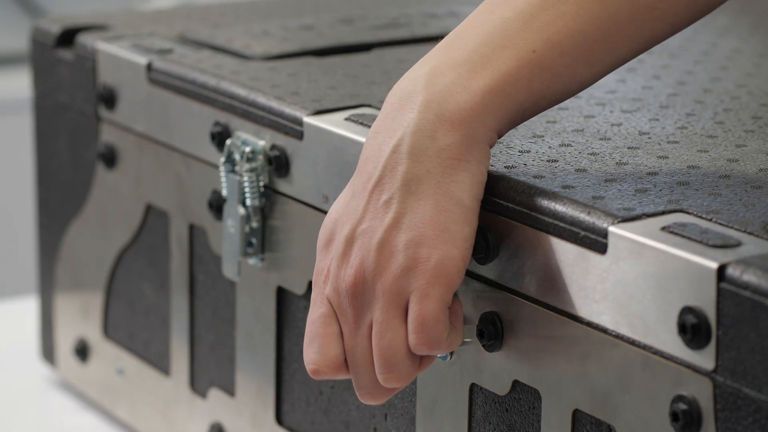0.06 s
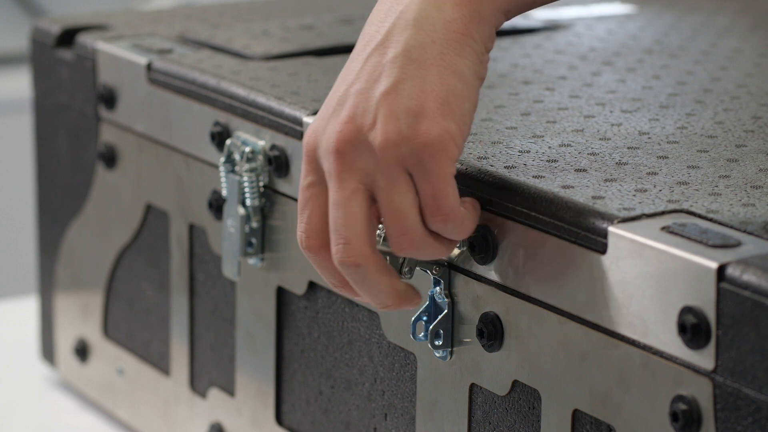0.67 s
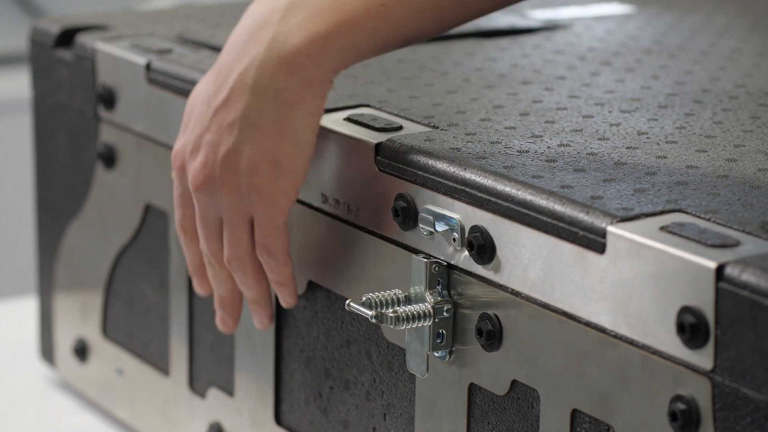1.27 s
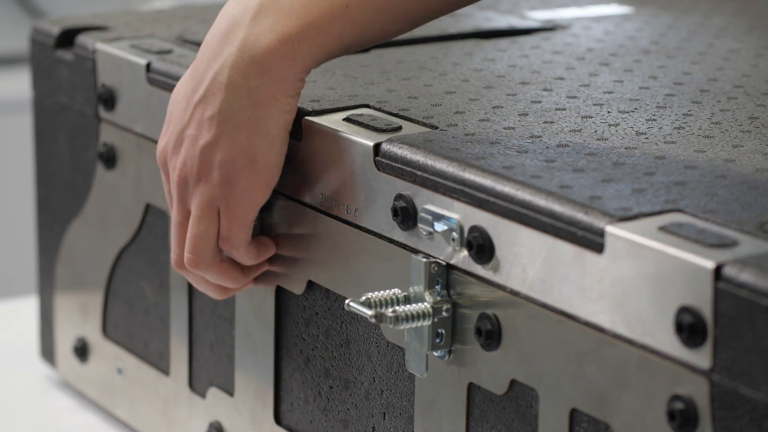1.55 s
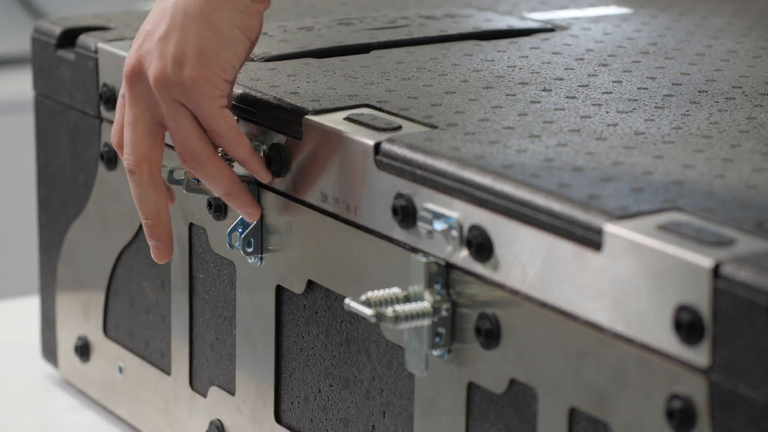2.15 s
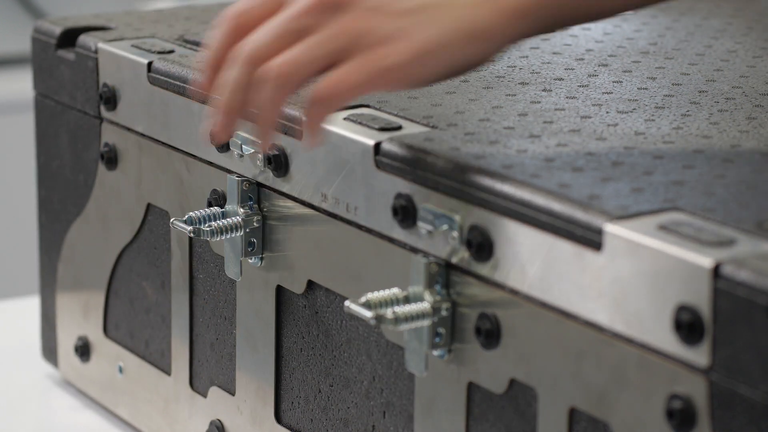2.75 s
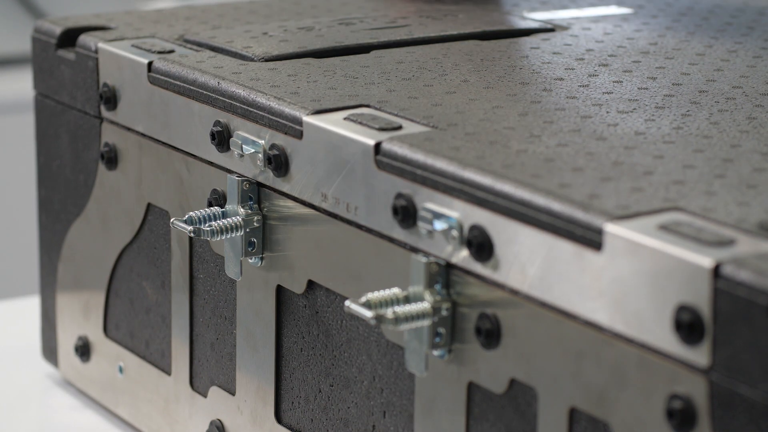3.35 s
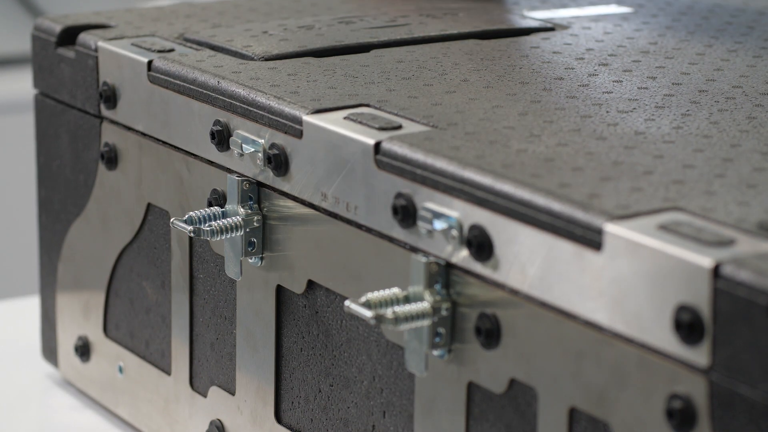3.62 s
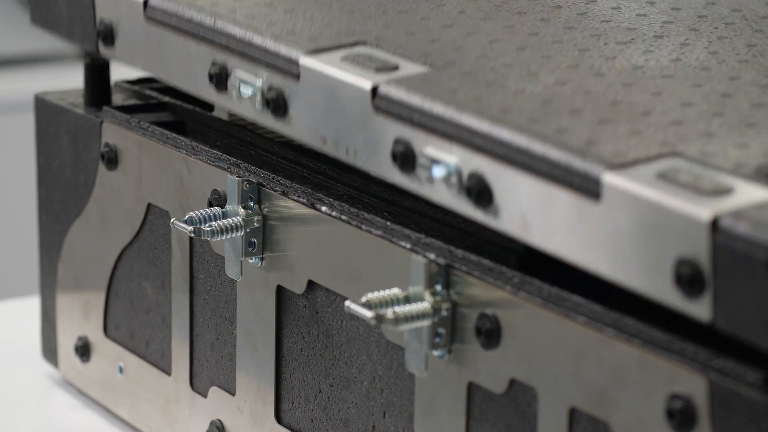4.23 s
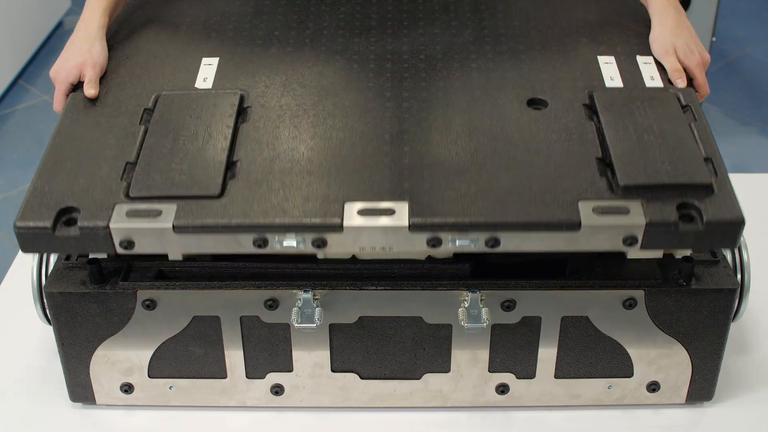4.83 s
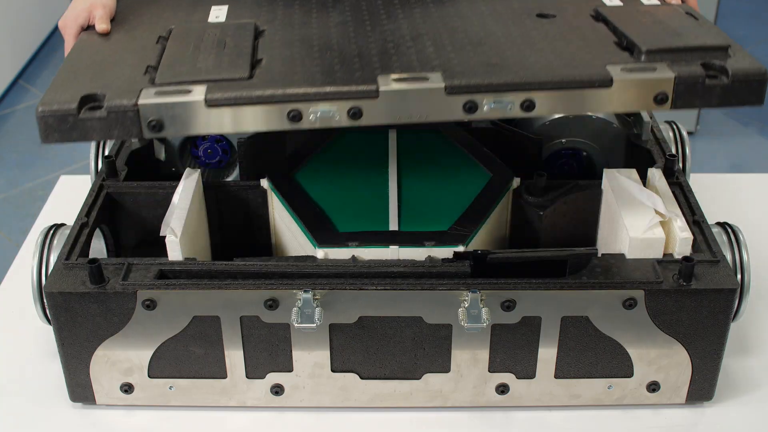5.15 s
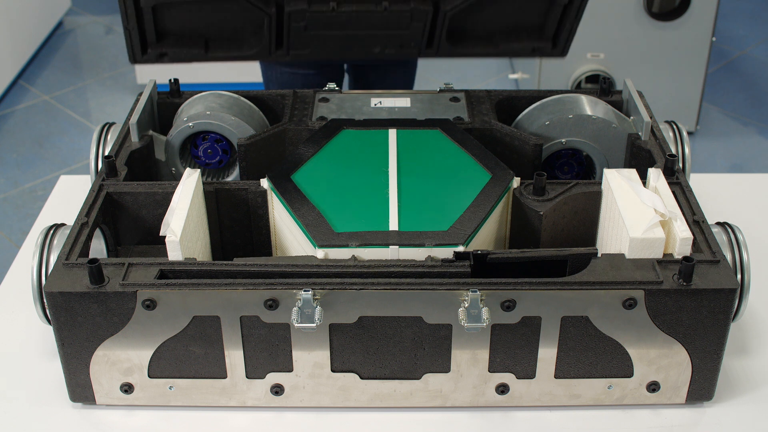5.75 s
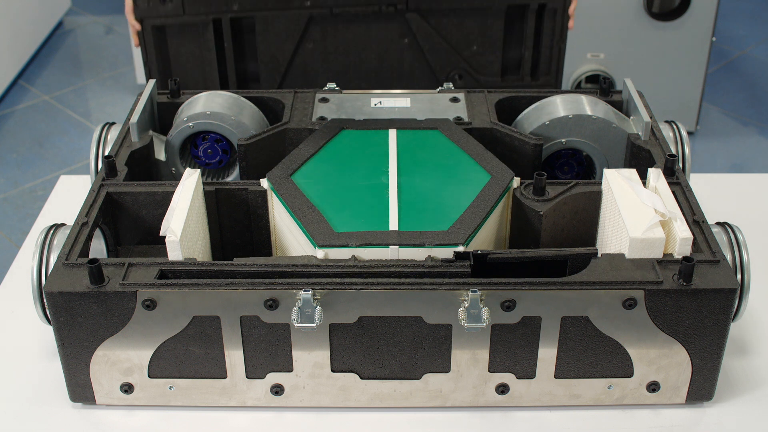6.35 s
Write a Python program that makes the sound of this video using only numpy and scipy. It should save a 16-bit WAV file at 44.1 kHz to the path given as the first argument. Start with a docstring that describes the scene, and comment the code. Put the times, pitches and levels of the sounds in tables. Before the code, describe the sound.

Light taps and finger brushes on metal lead into sharp clicks and snaps as two toggle latches are levered open near the microphone. Then the case's foam lid rasps and creaks in short low groans as it is pulled loose. It skids, falls back with a hollow, deep thump, and finally slides away with a soft scraping hiss. The indoor room has a short echo and a faint ventilation rumble.

```python
"""Unlatching a hard-foam case

Close up in a showroom, on one microphone: two sprung steel toggle latches are levered open and snap
free. The tight lid is worked upward, rubbing and groaning in its seat, drops back once and booms on
the air shut inside, then is lifted clear and slid down behind the case.
Short room echoes and faint ventilation lie behind it all."""
import sys
import numpy as np
from scipy import signal
from scipy.fft import rfft, irfft, next_fast_len
from scipy.io import wavfile
from scipy.ndimage import uniform_filter1d

SR = 44100
rng = np.random.default_rng(int(sys.argv[2]) if len(sys.argv) > 2 else 0)


def to_wav(s):
    """Save 16-bit WAV."""
    ch = np.atleast_2d(s).T  # columns
    pcm = np.round(np.clip(ch, -1, 1) * 32767)  # PCM
    wavfile.write(sys.argv[1], SR, pcm.astype(np.int16))


N = 281739
TIME = np.arange(N) / SR


def from_db(db):
    """Decibels to gain."""
    return np.exp(np.asarray(db) * np.log(10) / 20)


def unit_rms(x):
    """Scale to an rms of 1."""
    return x / np.sqrt(np.mean(x ** 2) + 1e-20)


def gain_curve(rows):
    """Gain through (time [s], level [dB]) points, fading to silence outside them."""
    times, levels_db = np.transpose(rows)
    outside_s = np.maximum(np.maximum(times[0] - TIME, TIME - times[-1]), 0)
    return from_db(np.interp(TIME, times, levels_db)) * np.exp(-np.minimum(outside_s / 0.0066, 20))


def stroke(s, level_db, hold_s, attack_s, release_s):
    """Gain of one stroke: it swells until time s, holds and dies away."""
    away = np.maximum((s - TIME) / attack_s, (TIME - s - hold_s) / release_s)
    return from_db(level_db) * np.exp(-np.clip(away, 0, 20))


def at_hz(points, hz, column=1):
    """Read a column of a table on a log-frequency axis."""
    table = np.array(points)
    return np.interp(np.log(hz + 1e-9), np.log(table[:, 0]), table[:, column])


def band(x, low, high, order=2):
    """Butterworth band-pass, edges in Hz."""
    sos = signal.butter(order, [low, min(high, .48 * SR)], "band", fs=SR, output="sos")
    return signal.sosfilt(sos, x)


def coloured(x, spectrum):
    """Give x a spectrum that falls away beyond its ends; rms 1."""
    size = next_fast_len(N, real=True)
    hz = np.arange(size // 2 + 1) * SR / size + 0.00088
    roll_off = np.minimum(1, np.minimum(hz / spectrum[0][0], spectrum[-1][0] / hz)) ** 4
    return unit_rms(irfft(rfft(x, size) * from_db(at_hz(spectrum, hz)) * roll_off, size)[:N])


def add(out, s, sound):
    """Mix a sound in at time s."""
    start = int(s * SR)
    out[start:start + len(sound)] += sound[:N - start]


# fingers, levers and hooks strike the case, close up (time [s], level [dB], hardness [dB], contact [s])
LATCH_STRIKES = [(0.276, -63.5, -16.5, 0.0051), (0.303, -64.5, -14, 0.0036), (0.436, -62, -7.5, 0.0019),
                 (0.765, -69.5, 5.5, .0036), (0.828, -66.5, -11.5, .0047), (1.176, -42.5, -2.5, .0016),
                 (1.1866, -41, 2.5, 0.0021), (1.2925, -45.5, 3.5, .0019), (1.395, -63, -6.5, .0014),
                 (1.5345, -41.5, -4.5, 0.0024), (1.548, -41, 2, 0.0028), (1.5618, -41, 6, .0023),
                 (1.576, -45.5, -1, 0.0029), (1.5882, -44, 8, .0025), (1.68, -52, -1.5, 0.0046),
                 (1.719, -35, 6, .0011), (1.7285, -51.5, -5.5, .0026), (1.7464, -48.5, 6.5, .0012),
                 (1.787, -56, -8, 0.0024), (2.1163, -39, 4, 0.0014), (2.2343, -28.5, 3, .0014),
                 (2.481, -58, -0.5, 0.00152), (2.528, -58.5, -10, 0.0042), (2.647, -63.5, 3.5, 0.001),
                 (2.746, -59, -1, 0.00069), (2.762, -47.5, -4.5, 0.00082), (2.802, -55, 9.5, .0013)]
# modes of the case with its steel trim and latches (frequency [Hz], level [dB], t60 [s])
CASE_RESONANCES = [(139, -6.5, 0.32), (224, -6, 0.088), (267.4, 1, 0.078), (417, 5, 0.056),
                   (531.4, 0.5, 0.11), (613, 0, 0.067), (789, -4.5, 0.034), (1008, 2, 0.037),
                   (1264, 0.5, 0.031), (1660, -17, .03), (2270, -15.5, .03), (3010, -14.5, .03),
                   (3450, -15.5, .022), (4300, -20.5, .025), (5410, -12.5, .03), (5858, -22, .1),
                   (8300, -16, .04), (13030, -21, .025)]
def latch_snaps(taps):
    """Levers, hooks and the given light taps set the steel-trimmed case ringing."""
    return blows(LATCH_STRIKES + taps, CASE_RESONANCES, crack_db=18, crack_s=.0006,
                 clatter_db=9.5, clatter_s=0.0093, clatter_hz=700,
                 chatter=0.55, spread_db=4.5, hard_db=-32, register_db=(-0.4, 0.23, -7, -15))


# a blow's four registers: thud, knock, clack and tick (low edge [Hz], high edge [Hz])
BLOW_BANDS = [(80, 350), (350, 1600), (2300, 7400), (7400, 17000)]
# hardness is a treble lift; the share each register takes (thud, knock, clack, tick [ratios])
HARDNESS_TILT = (-0.7, -0.057, .6, 1)
def blows(hits, modes, crack_db, crack_s, clatter_db, clatter_s, clatter_hz,
          chatter, spread_db, hard_db, register_db):
    """Each blow is a brief chattering contact that cracks and sets the body ringing."""
    out, t = np.zeros(N), np.arange(SR // 7) / SR
    times, force_db, hardness_db, contact_s = np.transpose(hits)[:, :, None]
    levels_db = [force_db + db + share * hardness_db for db, share in zip(register_db, HARDNESS_TILT)]
    noises = rng.standard_normal((len(hits), 3, len(t)))
    bounce_noise, clatter_noise, crack_noise = noises.transpose(1, 0, 2)
    # one sharp touch in a swarm of micro-bounces
    touch = np.arange(len(t)) == np.round(contact_s * SR / 2)
    bounces = bounce_noise * t * np.exp(-2 * t / contact_s)
    force = touch + chatter * bounces / np.linalg.norm(bounces, axis=1, keepdims=True)
    # every blow finds each mode with a strength of its own
    hz, mode_db, t60 = np.transpose(modes)[:, :, None]
    strengths = from_db(spread_db * rng.standard_normal((len(hits), len(modes))))
    ring = strengths @ (from_db(mode_db - 60 * t / t60) * np.sin(2 * np.pi * hz * t))
    # crowded, heavily damped panel modes lie between the clear ones
    pole = np.exp(-2 * np.pi * clatter_hz / SR)
    clatter = unit_rms(signal.lfilter([1], [1, -pole], clatter_noise)) * np.exp(-t / clatter_s)
    crack = crack_noise * (1 - np.exp(-2 * t / contact_s)) * np.exp(-t / (crack_s + contact_s))
    body = signal.fftconvolve(force, ring + from_db(clatter_db) * clatter, axes=1)[:, :len(t)]
    sound = body / np.hypot(1, chatter) + from_db(crack_db) * crack
    # only the hardest blows reach the very top; lighter ones are rounded off
    rounded = signal.lfilter([1 / 4, 1 / 2, 1 / 4], [1], sound)
    sharpness = from_db(np.minimum(levels_db[-1] - hard_db, 0))
    sound = rounded + sharpness * (np.roll(sound, 1, axis=1) - rounded)
    shaped, attack = 0, t < .016
    for (low, high), level_db in zip(BLOW_BANDS, levels_db):
        register = band(sound, low, high, order=3)
        shaped += from_db(level_db) * register / np.std(register[:, attack], axis=1, keepdims=True)
    for start, blow in zip(times[:, 0], shaped):
        add(out, start, blow)
    return out


# spells of fumbling at a lever (start [s], end [s], typical level [dB], hardness [dB])
FUMBLE_SPELLS = [(0.549, 1.06, -70, -2), (1.63, 1.901, -62.5, -7.5), (2.681, 2.78, -65.5, 0)]
def finger_taps(per_spell=4, spread_db=2.5, contact_s=.003):
    """Fumbling fingers scatter faint taps, returned as rows of strikes."""
    taps = []
    for start, end, level_db, hardness_db in FUMBLE_SPELLS:
        times = start + (end - start) * (np.arange(per_spell) + rng.random(per_spell)) / per_spell
        taps += [(s, level_db + spread_db * rng.standard_normal(), hardness_db, contact_s) for s in times]
    return taps


# fingers brush over the steel (time [s], level [dB], hold [s])
FINGER_BRUSHES = [(0.287, -74.5, 0.081), (0.435, -72.5, .1), (0.607, -66.5, 0.035), (0.76, -74.5, .08),
                  (0.998, -77.5, 0.026), (1.112, -64.5, 0.069)]
# load on the lever's pivot (time [s], relative level [dB])
PIVOT_LOAD = [(1.31, -55), (1.36, -68), (1.48, -75), (1.63, -57.5), (1.69, -49), (1.77, -52), (1.86, -59.4),
              (1.96, -71.5), (2.1, -69)]
# a lever is forced over its dead point (time [s], level [dB], hold [s])
LEVER_GRINDS = [(1.533, -43.5, 0.054), (2.16, -57, 0.036)]
# brushing and grinding as they reach the microphone (frequency [Hz], relative level [dB])
FINGER_SPECTRUM = [(200, -1), (500, 12), (1500, 0), (3000, 2.5), (6000, 0.5), (10000, -2.5), (16000, -7)]
PIVOT_SPECTRUM = [(70, -2.5), (140, 4.5), (300, 6), (550, 12), (1000, -5.5), (2000, -9.5), (5000, -18.5),
                  (9000, -27), (16000, -28.5)]
# the hook on its catch (middle [s], length [s], start pitch [Hz], end pitch [Hz], peak [dB])
HOOK_SQUEAKS = [(2.036, 0.061, 4830, 4680, -68.5), (2.043, 0.069, 3100, 2700, -68),
                (2.06, .025, 1560, 1500, -67), (2.078, .02, 5860, 6100, -58.5),
                (2.164, .016, 1680, 1770, -46.5)]
def latch_friction():
    """Fingers find the lever, the pivot grinds under load and the hook squeaks."""
    brushing = sum(stroke(*row, attack_s=0.011, release_s=0.061) for row in FINGER_BRUSHES)
    fingers = brushing * coloured(friction(2500, spread_db=1.2, smooth=0.98), FINGER_SPECTRUM)
    forcing = sum(stroke(*row, attack_s=.005, release_s=.007) for row in LEVER_GRINDS)
    load = from_db(-3.5) * gain_curve(PIVOT_LOAD) + forcing
    pivot = load * coloured(friction(900, spread_db=3.6, smooth=0.31), PIVOT_SPECTRUM)
    return fingers + pivot + stick_slip(HOOK_SQUEAKS, overtone_db=-33, waver=0.04)


def friction(slips_per_s, spread_db, smooth):
    """Countless tiny slips of uneven size over a smooth hiss."""
    chance, size, hiss = rng.random(N), rng.standard_exponential(N), rng.standard_normal(N)
    onsets = np.flatnonzero(chance < slips_per_s / SR)
    polarity = np.sign(hiss[onsets - N // 2])
    slips = np.zeros(N)
    slips[onsets] = polarity * from_db(spread_db * np.minimum(size[onsets], 4))
    return unit_rms(slips) + smooth * hiss


def stick_slip(rows, overtone_db, waver):
    """Short gliding tones of a surface that sticks and slips regularly."""
    out = np.zeros(N)
    for middle, length, start_hz, end_hz, level_db in rows:
        progress = np.linspace(0, 1, int(length * SR))
        unsteady = unit_rms(uniform_filter1d(rng.standard_normal(SR // 4), size=90))[:len(progress)]
        hz = (start_hz + (end_hz - start_hz) * progress) * (1 + waver * unsteady)
        phase = 2 * np.pi * np.cumsum(hz) / SR
        tone = np.sin(phase) + from_db(overtone_db) * np.sin(2 * phase)
        add(out, middle - length / 2, from_db(level_db) * np.sin(np.pi * progress) ** 1.86 * tone)
    return out


# the lid catches, slips and bumps, close up (time [s], level [dB], hardness [dB], contact [s])
LID_STRIKES = [(3.113, -70, -7, 0.0023), (3.168, -63.5, -8, .0034), (3.307, -61.5, -10.5, 0.0041),
               (3.365, -58.5, -4.5, 0.0019), (3.42, -61.5, 1, .0012), (3.438, -53, -4.5, .0012),
               (3.5437, -49.5, 5, .0017), (3.5906, -57, 9, 0.0009), (3.6195, -50, 8, .001),
               (4.301, -53.5, 3, 0.002), (4.336, -62, 4, .002), (4.389, -62, 5, .0023),
               (4.5594, -64.5, 4, 0.00047), (4.6946, -44.5, 3, 0.0013), (4.8437, -37.5, -10.5, 0.00198),
               (4.86, -48.5, -10, .0012), (5.169, -61, 5.5, .003), (5.294, -65, 2.5, 0.002),
               (5.462, -64, 1, 0.0028), (5.571, -65, 0, 0.0031), (5.812, -61.5, -9, 0.0063),
               (5.919, -59, -3.5, 0.0048)]
# modes of the foam lid (frequency [Hz], level [dB], t60 [s])
LID_RESONANCES = [(111, -9, 0.072), (152.7, -4.5, 0.23), (193, 1.5, 0.083), (254, 0.5, 0.058),
                  (433, -3.5, 0.033), (488, -0.5, 0.043), (744, -5.5, 0.027), (1010, -10, 0.0086),
                  (2940, -10, 0.025)]
# the lid bounces on the air shut in the case (time [s], frequency [Hz], level [dB], t60 [s], rise [s])
LID_BOOMS = [(4.64, 51, -37.5, 0.58, .03), (4.846, 49.2, -10.5, .42, 0.056),
             (4.846, 76.2, -27.5, .28, 0.0068)]
def lid_bumps():
    """The lid catches and knocks; when it drops, the whole panel booms."""
    out = blows(LID_STRIKES, LID_RESONANCES, crack_db=16.5, crack_s=0.0013,
                clatter_db=10, clatter_s=0.0058, clatter_hz=585,
                chatter=0.31, spread_db=3, hard_db=-36, register_db=(4, -0.35, -5.5, -13.5))
    t = np.arange(SR) / SR
    for s, hz, level_db, t60, rise_s in LID_BOOMS:
        envelope = from_db(level_db - 60 * t / t60) * (1 - np.exp(-t / rise_s))
        add(out, s, envelope * np.sin(2 * np.pi * hz * t))
    return out


# pull on the lid (time [s], relative level [dB])
LID_PULL = [(3.1, -84), (3.15, -68), (3.26, -74.3), (3.34, -68), (3.49, -63.5), (3.56, -52.5),
            (3.69, -60.5), (3.8, -58), (3.87, -57.5), (3.95, -48), (4.08, -55), (4.19, -49.5), (4.27, -53),
            (4.37, -56), (4.44, -56.0), (4.52, -68), (4.59, -62)]
# hands take hold of the foam (time [s], level [dB], hold [s])
HAND_GRIPS = [(3.147, -76, 0.16), (5.163, -69.5, .02)]
# the lid skids over the rim (time [s], level [dB], attack [s], hold [s], release [s])
RIM_SKID = (4.667, -32, 0.0242, 0.0111, 0.02)
# rasp, hiss and skid as they reach the microphone (frequency [Hz], relative level [dB])
RUB_RASP_SPECTRUM = [(250, -4), (430, 2), (590, -9.5), (730, -3), (950, -5.5), (1300, -12), (1900, -17.5),
                     (2800, -25)]
RUB_HISS_SPECTRUM = [(2700, -1.5), (4200, 0), (7100, -4), (11000, -12.5), (16000, -26)]
SKID_SPECTRUM = [(50, 0), (90, -3), (140, 7.5), (230, 7.5), (350, -4), (550, -5.5), (750, -3.5),
                 (1200, -11), (2200, -14), (2900, -12), (4000, -17), (7000, -18.5), (11000, -25.5),
                 (16000, -38)]
def lid_rubbing(firm_pull_db=-52):
    """Foam drags on foam: grainy rasp and hiss over a rumbling panel, then a skid over the rim."""
    pull = gain_curve(LID_PULL) / from_db(firm_pull_db)
    slips = friction(2500, spread_db=1.5, smooth=0.38)
    rumble = from_db(-45) * pull ** 0.96 * unit_rms(band(slips, 116, 231))
    rasp = from_db(-49.5) * pull ** 1.095 * coloured(slips, RUB_RASP_SPECTRUM)
    gripping = sum(stroke(*row, attack_s=0.0074, release_s=0.069) for row in HAND_GRIPS)
    hiss_gain = from_db(-63.5) * pull ** 1.07 + gripping
    hiss = hiss_gain * coloured(friction(2500, spread_db=3.9, smooth=0.6), RUB_HISS_SPECTRUM)
    s, level_db, attack_s, hold_s, release_s = RIM_SKID
    skid_gain = stroke(s, level_db, hold_s, attack_s, release_s)
    skid = skid_gain * coloured(friction(2200, spread_db=2.4, smooth=0.39), SKID_SPECTRUM)
    return rumble + rasp + hiss + skid


# the lid shudders in its seat (middle [s], length [s], middle pitch [Hz], peak [dB])
SEAT_GROANS = [(1.455, .08, 141.7, -52.5), (1.575, .07, 140.4, -41.5), (2.145, .075, 126.5, -37.5),
               (3.565, .07, 119.7, -39), (3.61, .08, 114.6, -43.5), (3.85, .065, 159.6, -37),
               (3.943, 0.0495, 177, -27.5), (4.12, .06, 166, -37), (4.188, .085, 156.4, -31.5),
               (4.276, .06, 164.7, -36), (4.403, .052, 173.8, -23.5), (4.645, .05, 193, -32),
               (4.695, .055, 161, -30)]
def lid_groans(sag=.13):
    """The tight lid sticks and slips; each groan sags in pitch as the grip lets go."""
    glides = [(s, length, hz * (1 + sag / 2), hz * (1 - sag / 2), db) for s, length, hz, db in SEAT_GROANS]
    return stick_slip(glides, overtone_db=-17, waver=0.041)


# speed of the lid going down the far side of the case (time [s], relative level [dB])
SLIDE_SPEED = [(5.33, -96), (5.338, -91), (5.53, -62.5), (5.544, -73), (5.564, -83), (5.57, -68),
               (5.744, -56.5), (5.76, -52.5), (5.85, -59), (5.888, -75), (5.918, -61.5), (6.086, -58.5),
               (6.372, -66), (6.389, -69)]
# its rasp and hiss as they reach the microphone (frequency [Hz], relative level [dB])
SLIDE_RASP_SPECTRUM = [(130, -3), (220, -8), (310, 1), (420, 0.5), (560, -7), (900, -7), (1300, -10),
                       (2200, -11)]
SLIDE_HISS_SPECTRUM = [(2300, -1), (3000, -0.5), (5000, -1), (10000, -7), (16000, -13.5)]
# resonances of the case's hollow back wall (frequency [Hz], width [Hz], level [dB])
BACK_WALL = [(404, 130, -63.5), (921, 110, -64), (1574, 51, -69.5)]
def lid_sliding(brisk_db=-58, wall_contact_s=5.78, wall_fade_s=.04):
    """The freed lid slides down in two strokes, swaying and swishing; the back wall rings hollow."""
    speed = gain_curve(SLIDE_SPEED) / from_db(brisk_db)
    slips = friction(6000, spread_db=3.3, smooth=1)
    sway = from_db(-63.5) * speed ** 1.4 * unit_rms(band(slips, 42, 65))
    rasp = from_db(-58) * speed ** 0.73 * coloured(slips, SLIDE_RASP_SPECTRUM)
    fine_slips = friction(7000, spread_db=2.7, smooth=0.83)
    hiss = from_db(-58) * speed ** 0.95 * coloured(fine_slips, SLIDE_HISS_SPECTRUM)
    swish = from_db(-68.5) * speed ** 2.9 * unit_rms(band(rng.standard_normal(N), 2400, 3240))
    drag = friction(6000, spread_db=3.6, smooth=1)
    wall = sum(from_db(db) * unit_rms(band(drag, hz - width / 2, hz + width / 2, order=1))
               for hz, width, db in BACK_WALL)
    wall_contact = np.clip((TIME - wall_contact_s) / wall_fade_s + 1 / 2, 0, 1)
    return sway + rasp + hiss + swish + wall_contact * speed * wall


# the showroom around the microphone (frequency [Hz], t60 [s], echo level [dB])
ROOM_DECAY = [(102.5, 0.33, -10), (303, 0.42, -10), (1020, 0.5, -15), (3500, 0.56, -12), (7100, 0.41, -13),
              (14000, 0.27, -14.5)]
def showroom_echoes(x, first_echo_s, build_s):
    """Diffuse echoes build up after the first reflection and die band by band."""
    t, response = np.arange(SR) / SR, 0
    edges = np.geomspace(60, 18000, 13)
    onset = 1 - np.exp(-np.maximum(t - first_echo_s, 0) / build_s)
    for low, high in zip(edges, edges[1:]):
        hz = np.sqrt(low * high)
        decay = from_db(-60 * t / at_hz(ROOM_DECAY, hz))
        tail = band(rng.standard_normal(SR), low, high) * onset * decay
        gain = from_db(at_hz(ROOM_DECAY, hz, column=2)) * np.sqrt(2 * (high - low) / SR)
        response += gain * tail / np.linalg.norm(tail)
    return signal.fftconvolve(x, response)[:N]


# room tone, far in the background (frequency [Hz], relative level [dB])
VENTILATION_SPECTRUM = [(42, 0.5), (50, 10.5), (66, -4), (100, 1.5), (160, -0.5), (250, -6.5), (400, -16.5),
                        (630, -16), (1000, -21.5), (2000, -27.5), (4000, -32), (8000, -35.5),
                        (16000, -39.5)]
def ventilation(level_db=-66.5):
    """Moving air makes a faint, steady rumble."""
    return from_db(level_db) * coloured(rng.standard_normal(N), VENTILATION_SPECTRUM)


def scene():
    """Latches and lid close to the microphone, the showroom behind them; mono."""
    taps = finger_taps()
    snaps = latch_snaps(taps)
    handling = latch_friction() + lid_bumps() + lid_rubbing() + lid_groans() + lid_sliding()
    # a snap radiates a different colour each way, so the echoes of two directions blend
    front = showroom_echoes(snaps / np.sqrt(2) + handling, first_echo_s=0.0045, build_s=0.0018)
    back = showroom_echoes(latch_snaps(taps) / np.sqrt(2), first_echo_s=0.0084, build_s=.003)
    return (snaps + handling + front + from_db(-0.6) * back + ventilation())[None]


def record(dry):
    """The microphone signal is cut steeply above 15.8 kHz."""
    return signal.sosfilt(signal.ellip(10, .1, 80, 15800, fs=SR, output="sos"), dry)


dry = scene()
out = record(dry)
to_wav(out)
```